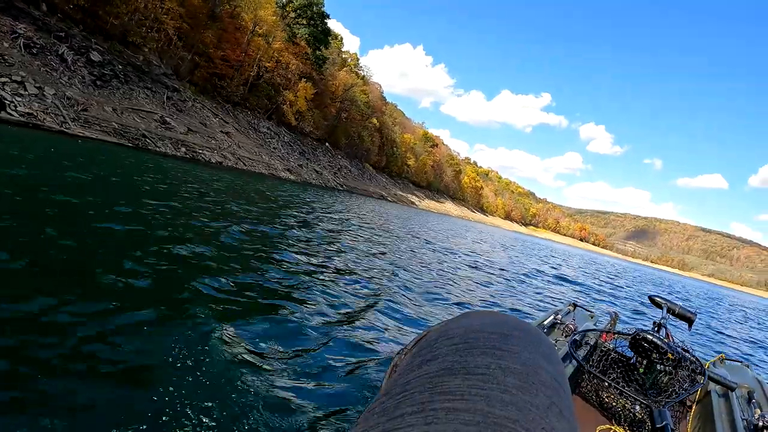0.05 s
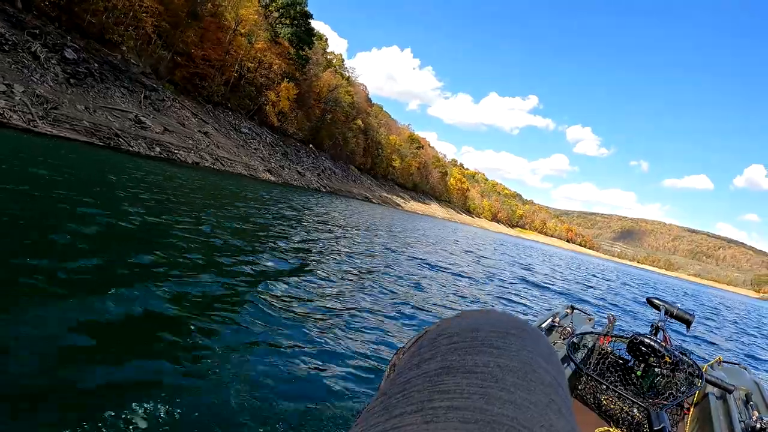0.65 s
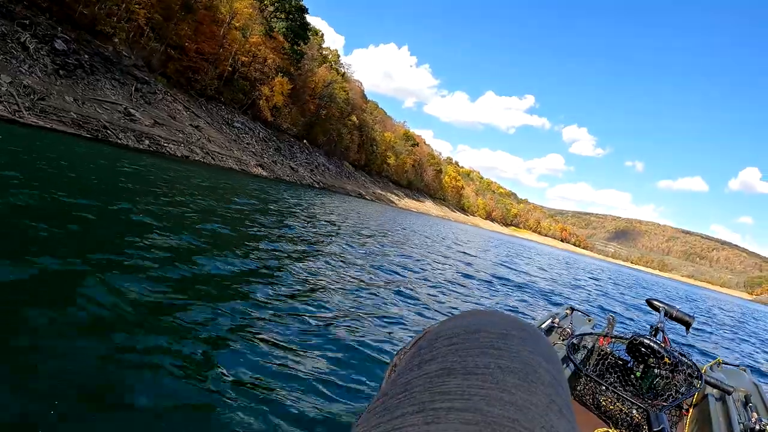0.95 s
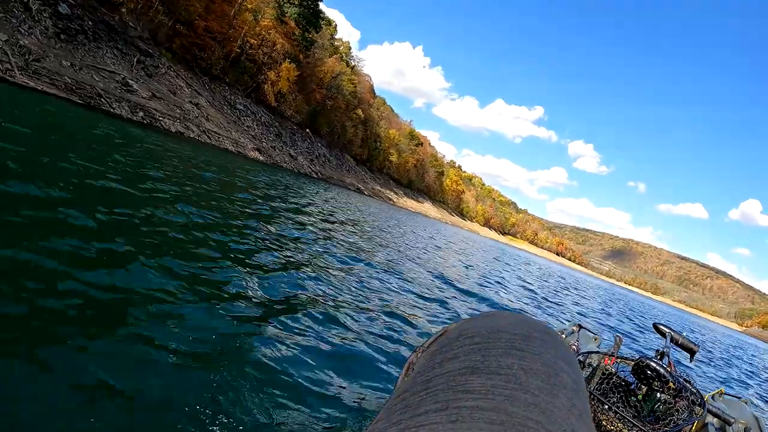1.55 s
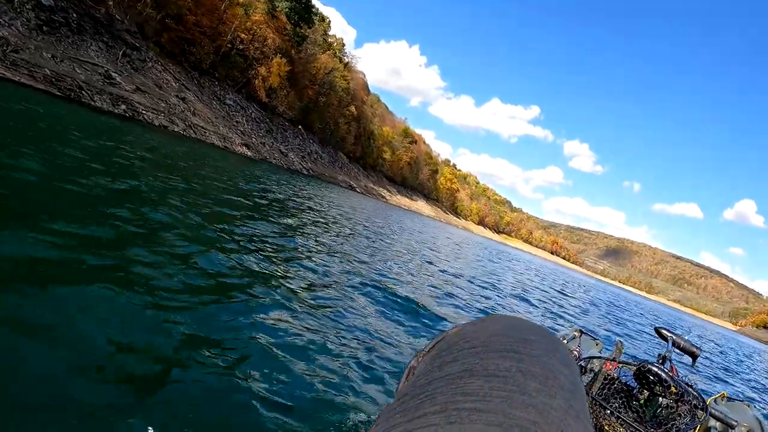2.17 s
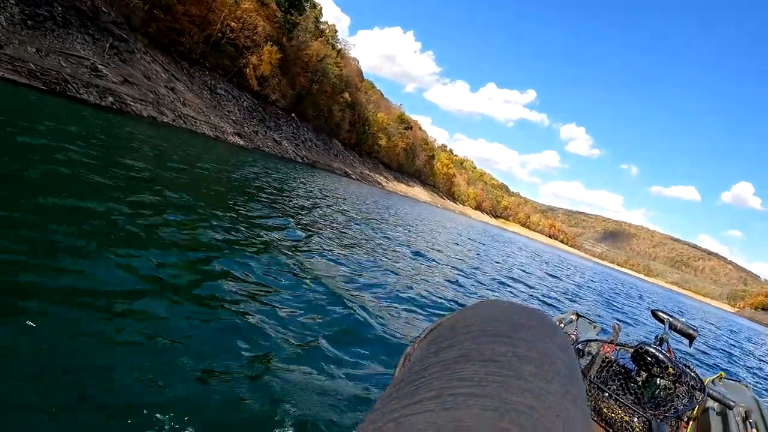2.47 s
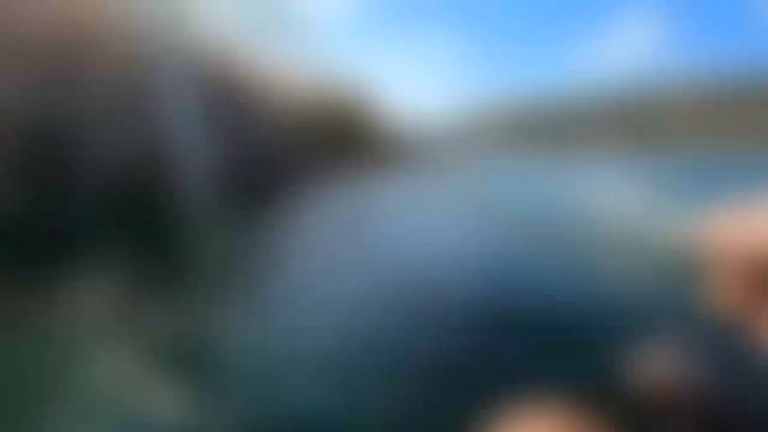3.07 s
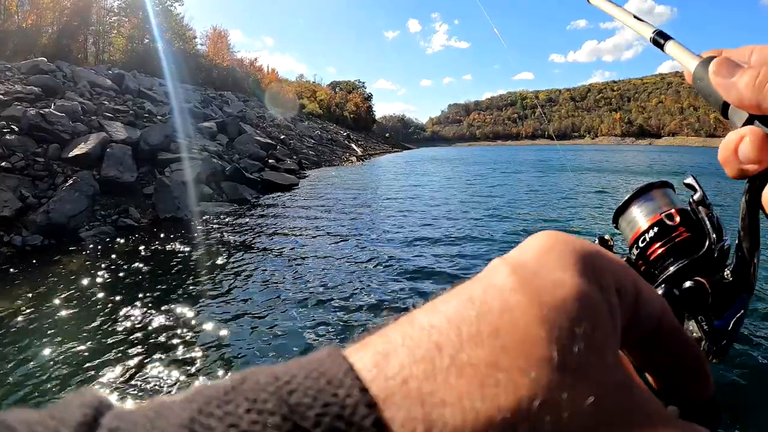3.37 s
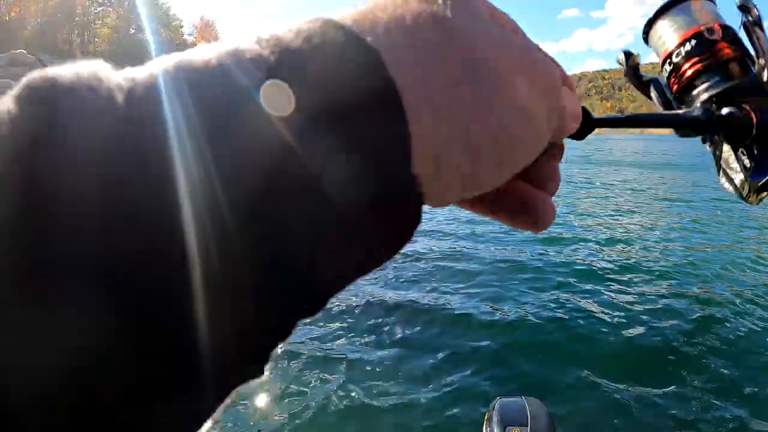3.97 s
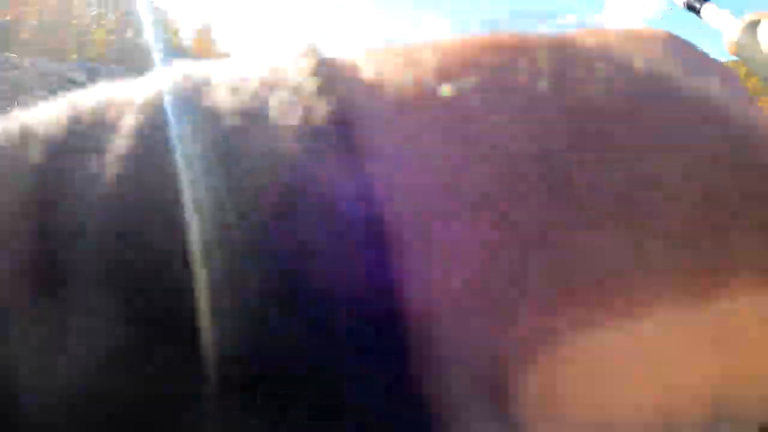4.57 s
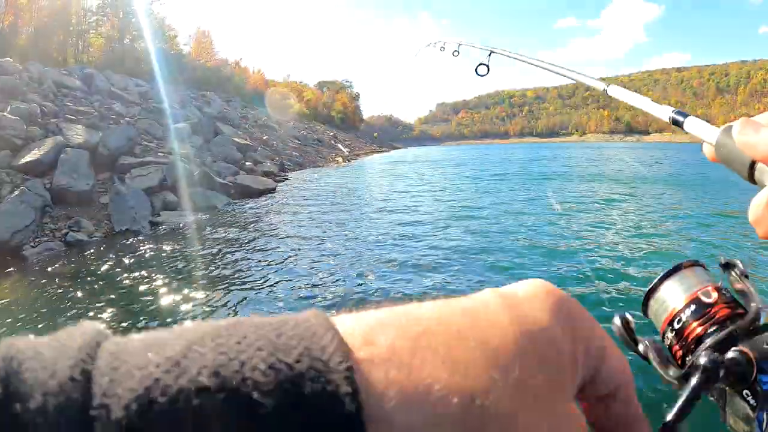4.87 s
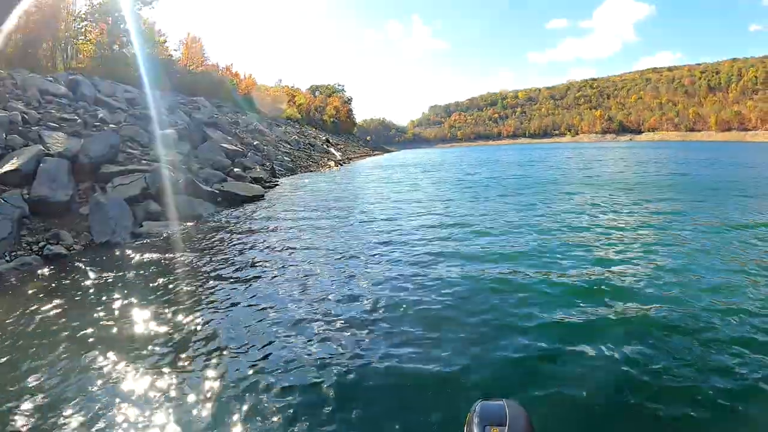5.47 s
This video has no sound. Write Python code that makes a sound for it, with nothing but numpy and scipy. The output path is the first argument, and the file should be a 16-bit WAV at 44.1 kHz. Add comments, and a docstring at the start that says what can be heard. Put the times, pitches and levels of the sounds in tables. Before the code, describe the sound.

Heard from aboard a small boat on a lake, an electric motor drones and whines evenly through the hull over churning water and a low wind rumble. After about three seconds it cuts off. The rest is much quieter: close, irregular slaps and plops of water against the hollow hull, scattered ticks from a fishing reel and the faint brush of a sleeve.

```python
"""On a lake, in a small boat. An electric trolling motor's shaft shakes the hull 40 times a second,
with a thin armature whine on top. Switched off, it stops at once. Small waves then slap the hull,
each with a gulp of trapped air, a slosh and a thud; bubbles plop, a sleeve rustles and a fishing
reel ticks. Light wind rumbles on the microphone."""
import sys
import numpy as np
from scipy.fft import rfft, irfft, next_fast_len
from scipy.io import wavfile
from scipy.ndimage import uniform_filter1d, minimum_filter1d, map_coordinates

SR = 44100
rng = np.random.default_rng(int(sys.argv[2]) if len(sys.argv) > 2 else 0)


def unload_wav(signal):
    """Save mono or channel-first audio to the path in sys.argv[1] as 16-bit WAV at rate SR, clipped to [-1, 1]."""
    wavfile.write(
        sys.argv[1],
        SR,
        np.round(np.clip(np.atleast_2d(signal).T, -1, 1) * 32767).astype(np.int16),
    )


N = 248061

# shaft speed: time_s, speed_hz
SHAFT_SPEED = [(0, 40.01), (.35, 39.796), (.7, 39.935), (1.25, 40.085), (1.6, 40.048), (2.1, 40.138),
               (2.7, 40.227), (3, 39.995)]
# waves on the hull: peak_s, level_db, pocket_hz, slosh_t60_s, spray_rel_db, thud_rel_db
WAVE_SLAPS = [(3.575, -19, 328, 0.047, -28.5, -17), (3.602, -15.5, 430, .17, -28.5, -17.5),
              (4.075, -29.5, 343, 0.64, -18.5, -11), (4.222, -29, 400, 0.18, -16, -12),
              (4.427, -20, 290, 0.35, -22.5, -11), (4.58, -24, 556, 0.15, -14, -28),
              (4.971, -26.5, 450, .12, -14, -24), (5.048, -13, 308, .22, -23, -24),
              (5.555, -26.5, 444, 0.31, -18, -22), (5.609, -24.5, 410, .15, -20, -13)]
# water closing over an air pocket: freq_hz, density_db
SLOSH_SPECTRUM = [(60, -2.5), (170, -0.5), (320, 3.5), (700, -3), (1100, -12), (1800, -15.5), (3200, -19),
                  (5000, -35), (10000, -46)]


def amp(db):
    """Decibels to gain."""
    return 10 ** (np.asarray(db) / 20)


def unit(x):
    """Scale to rms 1."""
    return x / np.sqrt(np.mean(x ** 2) + 1e-20)


def along(points, hz):
    """Interpolate (freq_hz, value) points on a log axis."""
    freqs_hz, values = np.transpose(points)
    return np.interp(np.log(hz + 1e-9), np.log(freqs_hz), values)


def curve(points):
    """Interpolate (time_s, value) points per sample."""
    return np.interp(np.arange(N) / SR, *np.transpose(points))


def wobble(rate_hz):
    """Smooth random curve with knots at rate_hz."""
    knots = rng.standard_normal(int(N * rate_hz / SR) + 4)
    return map_coordinates(knots, [np.arange(N) * rate_hz / SR])


def filtered(x, response):
    """Apply a frequency response."""
    size = next_fast_len(N + SR // 2)
    return irfft(rfft(x, size) * response(np.fft.rfftfreq(size, 1 / SR)), size)[:N]


def coloured(x, spectrum):
    """Shape x by a spectrum; rms 1."""
    return unit(filtered(x, lambda hz: amp(along(spectrum, hz))))


def noise(spectrum):
    """Shaped noise, rms 1."""
    return coloured(rng.standard_normal(N), spectrum)


def band_noise(centre_hz, width_hz):
    """Noise in one resonant band, rms 1."""
    white = rng.standard_normal(N)
    return unit(filtered(white, lambda hz: 1 / (1 + (2 * (hz - centre_hz) / width_hz) ** 2)))


def minimum_phase(gain):
    """Response with these gains that starts at once and rings out."""
    cepstrum = irfft(np.log(np.maximum(gain, 1e-6)))
    half = len(cepstrum) // 2
    cepstrum[1:half] *= 2
    cepstrum[half + 1:] = 0
    return np.exp(rfft(cepstrum))


def surge(peak_s, rise_s, t60_s):
    """Envelope: up 60 dB in rise_s, then exponential decay."""
    t = np.arange(N) / SR - peak_s
    return amp(60 * np.minimum(t / rise_s, -t / t60_s))


def add(track, start_s, sound):
    """Mix a sound into the track."""
    start = int(np.clip(round(start_s * SR), 0, N))
    track[start:start + len(sound)] += sound[:N - start]


def wind(trim_db=1, air_db=-50):
    """Slow buffets on the microphone, weaker once the motor stops, over the lake's steady hush."""
    # wind strength: time_s, level_db
    strength = [(0, -16.5), (1.3, -17), (2.8, -22), (3.08, -26), (3.25, -41.5), (3.7, -30), (4.2, -39.5),
                (5.62, -32.5)]
    # buffets: freq_hz, density_db
    rumble_spectrum = [(3, -39.5), (8, 1.5), (14, 2), (28, -8.5), (40, -14), (60, -18), (110, -34.5),
                       (300, -60), (1000, -100)]
    # open air: freq_hz, density_db
    air_spectrum = [(40, 8.5), (85, -1.5), (190, -3), (320, -4.5), (700, -6), (1100, -9), (1800, -12),
                    (2700, -20.5), (5000, -24), (8000, -31), (15500, -36.5)]
    return amp(curve(strength) + trim_db) * noise(rumble_spectrum) + amp(air_db) * noise(air_spectrum)


def wake(peak_s=2.1, swell_s=.35, level_db=-58):
    """Foam from the wake hisses past once."""
    swell = np.exp(-((np.arange(N) / SR - peak_s) / swell_s) ** 2)
    return amp(level_db) * swell * band_noise(centre_hz=7200, width_hz=2200)


def hull_boom(centre_hz, width_hz, level_db):
    """The hollow hull booms in a narrow band."""
    return amp(level_db) * band_noise(centre_hz, width_hz)


def bubble(hz, life_s, glide_oct_per_s):
    """An air pocket rings, gliding in pitch, until it surfaces and dies."""
    t = np.arange(int(life_s * SR) + 2) / SR
    phase = 2 * np.pi * np.cumsum(hz * 2 ** (glide_oct_per_s * t)) / SR
    onset = 1 - np.exp(-2 * hz * t)
    surfacing = np.exp(-(2 * t / life_s) ** 4)
    return np.sin(phase) * onset * amp(-60 * t / life_s) * surfacing


def bubbles(lo_hz, hi_hz, cycles, spread_db, count):
    """Small bubbles of random time, pitch and level; rms 1."""
    track = np.zeros(N)
    for when, pitch, size, climb in rng.random((count, 4)):
        hz = lo_hz * (hi_hz / lo_hz) ** pitch
        life_s = cycles / hz
        add(track, when * N / SR, amp(spread_db * size) * bubble(hz, life_s, .5 * climb / life_s))
    return unit(track)


def trickle():
    """Fine bubbles burst over a soft fizz; rms 1."""
    # fizz: freq_hz, density_db
    spectrum = [(500, -20), (1100, -8.5), (1800, 1), (2600, -10), (3500, -10.5), (6000, -23.5),
                (12000, -37.5)]
    fine = .45 * bubbles(1000, 4500, cycles=18, spread_db=14, count=1200)
    return coloured(rng.standard_normal(N) + fine, spectrum)


def ripples(lap_db=-48.5, fizz_db=-52, swing_db=3):
    """Ripples lap at the hull and shed fine bubbles as they fall back."""
    # water's unrest: time_s, level_db
    unrest = [(3.2, -0.5), (3.7, 3), (3.95, -2.5), (4.35, -2.5), (4.85, -1), (5.25, 4), (5.62, -1)]
    # lapping: freq_hz, density_db
    lap_spectrum = [(60, -10.5), (170, -12), (320, -9), (700, -8), (1100, -18.5), (2500, -53.5),
                    (6000, -70.5)]
    unrest_db = curve(unrest)
    churn = rng.standard_normal(N) + .5 * bubbles(188, 1085, cycles=12.3, spread_db=6, count=600)
    lap_gain = amp(lap_db + .4 * unrest_db + swing_db * wobble(20))
    fizz_gain = amp(fizz_db + 1.56 * unrest_db + swing_db * wobble(30))
    return lap_gain * coloured(churn, lap_spectrum) + fizz_gain * trickle()


def sleeve(rest_db=-68, scratch_db=5.3):
    """Cloth brushes in tiny catches with each stroke of the arm that winds the reel."""
    # arm strokes: peak_s, level_db, swell_s, fade_s
    strokes = [(3.23, -49, 0.069, 0.092), (3.7, -50, 0.055, 0.077), (4.24, -57, 0.056, 0.055),
               (4.59, -56.5, 0.024, .06), (4.9, -59, 0.023, .06), (5.07, -58, .06, 0.091),
               (5.32, -49, 0.14, .06), (5.62, -60, 0.13, .05)]
    # cloth friction: freq_hz, density_db
    spectrum = [(800, -26.5), (2500, 4.5), (4500, -1.5), (7200, -2.5), (9000, -10), (12000, -15.5),
                (15500, -32)]
    t = np.arange(N) / SR
    rub = sum(amp(db) * np.exp(-((t - peak_s) / np.where(t < peak_s, swell_s, fade_s)) ** 2)
              for peak_s, db, swell_s, fade_s in strokes)
    return (amp(rest_db) + rub) * unit(noise(spectrum) * amp(scratch_db * wobble(350)))


def reel(crack_gain=.1014, crack_t60_s=.006, scatter_db=4.4):
    """Each tick is a short crack plus the ring of the reel's small parts."""
    # ticks: start_s, peak_db, tilt_db_per_oct
    ticks = [(3.338, -31, -27), (3.384, -31, -2), (3.783, -26, -16), (3.7873, -12.5, 1.5),
             (4.157, -35, -14), (4.1964, -34, -10), (4.2253, -33, -2), (4.305, -30, 1.5), (4.496, -38, 25),
             (4.684, -32, -17), (4.8993, -36, 15), (5.347, -30.5, -5), (5.422, -29.5, -18),
             (5.5, -20.5, 20)]
    # ringing parts: freq_hz, level_db, t60_s
    modes = [(1814, -34, .03), (2930, -12, 0.028), (4290, 3, 0.011), (4683, 2, 0.01), (5150, -1.5, 0.014),
             (6040, -1, 0.0077), (7050, -1.5, 0.012), (11150, -15.5, 0.0066), (12300, -17, .005),
             (14800, -20.5, .004)]
    track, t = np.zeros(N), np.arange(SR // 16) / SR
    for start_s, peak_db, tilt_db_per_oct in ticks:
        tick = np.zeros(len(t))
        for hz, level_db, t60_s in modes:
            mode_db = level_db + rng.normal(0, scatter_db) + tilt_db_per_oct * np.log2(hz / 5000)
            tick += amp(mode_db - 60 * t / t60_s) * np.sin(2 * np.pi * hz * t)
        tick += crack_gain * rng.standard_normal(len(t)) * amp(-60 * t / crack_t60_s)
        add(track, start_s, amp(peak_db) * tick / np.abs(tick).max())
    return track


def plops(splash_rel_db=-15):
    """Single bubbles ring as they rise, each with a small splash."""
    # bubbles beside the boat: start_s, pitch_hz, level_db, life_s, glide_oct_per_s
    events = [(3.204, 600, -32.5, 0.038, -4), (3.25, 886, -30.5, .058, -6), (3.354, 606, -29.5, 0.039, 18),
              (3.519, 1930, -34.5, 0.068, 5), (3.62, 640, -22.5, 0.11, 3.5), (3.727, 720, -34, .11, 11),
              (3.858, 402, -30.5, 0.048, -5), (4.01, 338, -27.5, .03, -7), (4.072, 1800, -33.5, 0.033, 8),
              (4.183, 1006, -34, .06, 9), (4.22, 1556, -27, .034, 24), (4.3, 840, -34.5, 0.15, 27),
              (4.425, 535, -22.5, 0.074, 8), (4.593, 718, -27.5, 0.11, 15), (4.735, 1490, -35, .035, 9),
              (4.878, 1150, -34, .045, 17), (4.97, 1560, -20, 0.011, 25), (5.044, 1010, -25.5, .042, 7),
              (5.049, 500, -14, 0.03, 9), (5.226, 700, -17, 0.039, 23)]
    rings, splash = np.zeros((2, N))
    for start_s, hz, db, life_s, glide_oct_per_s in events:
        add(rings, start_s, amp(db) * bubble(hz, life_s, glide_oct_per_s))
        splash += amp(db + splash_rel_db) * surge(start_s, rise_s=.0081, t60_s=.07)
    return rings + splash * noise(SLOSH_SPECTRUM)


def thuds():
    """Each wave pushes the hollow hull, which answers with a dull thud."""
    # hull thud: freq_hz, density_db
    spectrum = [(20, -4), (45, -3), (85, -2.5), (130, -0.5), (220, -10), (500, -40), (1500, -80)]
    push = sum(amp(db + thud_rel_db) * surge(peak_s, rise_s=.03, t60_s=.35)
               for peak_s, db, *_, thud_rel_db in WAVE_SLAPS)
    return push * noise(spectrum)


def waves(slosh_rel_db=-14.5, rise_s=.062, spray_t60_s=.2):
    """Each wave traps air that rings and breaks up, while water sloshes over it and throws spray."""
    cycles, glide_oct_per_s = 21.5, 4.1
    pieces, gap_s, spread_oct = 4, .017, .39
    first_piece_db, step_db = -3, -4
    rings, slosh, spray = np.zeros((3, N))
    for peak_s, db, hz, slosh_t60_s, spray_rel_db, _ in WAVE_SLAPS:
        add(rings, peak_s, amp(db) * bubble(hz, cycles / hz, glide_oct_per_s))
        for k, (late, pitch, climb) in enumerate(rng.uniform(-1.027, 1, (pieces, 3))):
            piece_hz = hz * 2 ** (spread_oct * pitch)
            piece = bubble(piece_hz, cycles / piece_hz, glide_oct_per_s * climb)
            start_s = peak_s + gap_s * (k + 1 + late / 2)
            add(rings, start_s, amp(db + first_piece_db + step_db * k) * piece)
        slosh += amp(db + slosh_rel_db) * surge(peak_s, rise_s, slosh_t60_s)
        spray += amp(db + spray_rel_db) * surge(peak_s, rise_s, spray_t60_s)
    return rings + slosh * noise(SLOSH_SPECTRUM) + spray * trickle()


def hull_cycle(size=2048):
    """Hull response to one shaft turn: a ringing knock, its low bending waves arriving late; rms 1."""
    # hull drone: shaft_order, level_db
    drone_partials = [(1, -5.5), (2, 0.5), (3, 2.5), (4, -7), (5, -12.5), (6, -4), (7, -11), (8, -9.5),
                      (9, -4.5), (10, -5.5), (11, -21.5), (12, -13.5), (13, -9.5), (14, -10), (15, -10),
                      (16, -20), (17, -8), (18, -1.5), (19, -9.5), (20, -17), (21, -16), (22, -17.5),
                      (23, -24), (24, -20), (25, -15.5), (26, -13), (27, -28.5), (28, -21), (29, -22),
                      (30, -23)]
    # buzz above the drone: shaft_order, level_db
    buzz_partials = [(31, -36.5), (36, -29.5), (40, -39.5), (50, -48), (64, -35), (80, -50.5), (180, -62.5),
                     (400, -95.5)]
    # bending waves crossing the hull: freq_hz, delay_s
    delays = [(120, 0.00061), (200, 0.0049), (300, 0.0144), (400, 0.01466), (470, 0.0012), (540, 0.0028),
              (1000, 0.001676)]
    order = np.arange(size // 2 + 1)
    gain = amp(np.interp(order, *np.transpose(list(drone_partials) + list(buzz_partials))))
    shaft_hz = SHAFT_SPEED[0][1]
    lag_rad = 2 * np.pi * np.cumsum(along(delays, order * shaft_hz)) * shaft_hz
    # high partials take many paths and spread over the whole turn
    scatter_rad = np.interp(order, [45, 90], [0, np.pi]) * rng.uniform(-1, 1, len(order))
    return unit(irfft(minimum_phase(gain) * np.exp(1j * (scatter_rad - lag_rad)) * (order > 0)))


def hull_drone(turns, level_db=-15, split_hz=280, knock_db=-.9, harden_db_per_s=.55):
    """Each turn knocks the hull: the blades' low beat throbs in eddies, the uneven knocks harden."""
    t = np.arange(N) / SR
    cycle = hull_cycle()
    drone = np.interp(turns % 1, np.arange(len(cycle)) / len(cycle), cycle, period=1)
    bass = filtered(drone, lambda hz: 1 / (1 + (hz / split_hz) ** 6))
    throb = amp(1.3 * wobble(18))
    knocks = amp(knock_db + harden_db_per_s * t + .9 * wobble(40))
    return amp(level_db) * (bass * throb + (drone - bass) * knocks)


def armature_whine(turns, start_db=2.3, fade_db_per_s=1.6, jitter_turns=.0012):
    """The armature whines at high multiples of the shaft speed, mellowing as it runs."""
    # armature tones: shaft_order, level_db
    tones = [(38, -42), (39, -50), (44, -52), (47, -56), (57, -54), (60, -50), (67, -58), (148, -67),
             (186, -71)]
    whine = np.zeros(N)
    for order, db in tones:
        gain = amp(db + 1.5 * wobble(14))
        whine += gain * np.cos(2 * np.pi * order * (turns + jitter_turns * wobble(40)))
    return amp(start_db - fade_db_per_s * np.arange(N) / SR) * whine


def propeller_wash(turns, level_db=-22.5, fade_turns=.21):
    """Each turn stirs a burst of wash."""
    # wash and brush noise: freq_hz, density_db
    spectrum = [(8, -29.5), (28, 7.5), (60, 4.5), (110, 1), (200, -1), (380, -1), (550, -6), (740, -9.5),
                (1200, -15), (2000, -20.5), (2550, -25), (3200, -31), (7300, -42), (9000, -49),
                (15500, -60)]
    burst = 1 + np.exp(-(turns % 1) / fade_turns)
    return coloured(burst * rng.standard_normal(N), spectrum) * amp(level_db + .33 * wobble(6.9))


def motor(gain_db=1.5, first_knock_s=.0058, off_s=3.086, fade_s=.092):
    """The shaft drives drone, whine and wash over a hull boom; all die quickly at switch-off."""
    t = np.arange(N) / SR
    drive = amp(gain_db) * np.clip(1 - (t - off_s) / fade_s, 0, 1) ** 1.02
    shaft_hz = curve(SHAFT_SPEED)
    turns = np.cumsum(shaft_hz) / SR - first_knock_s * shaft_hz[0]
    running = hull_drone(turns) + armature_whine(turns) + propeller_wash(turns)
    return drive * (running + hull_boom(centre_hz=151, width_hz=5.5, level_db=-39.5))


def scene():
    """Mono mix; everything close, in open air."""
    rocking = hull_boom(centre_hz=123.3, width_hz=21, level_db=-49)
    rocking += hull_boom(centre_hz=86, width_hz=25, level_db=-54.5)
    boat = motor() + ripples() + waves() + thuds() + plops() + rocking
    return (boat + sleeve() + reel() + wake() + wind())[None]


def record(dry, ceiling=.9, cutoff_hz=15780):
    """Peak limiter, then a brick-wall low-pass."""
    needed = np.minimum(1, ceiling / (np.abs(dry) + 1e-9))
    gain = uniform_filter1d(minimum_filter1d(needed, size=600), size=500)
    return np.array([filtered(channel, lambda hz: hz < cutoff_hz) for channel in dry * gain])


dry = scene()
out = record(dry)
unload_wav(out)
```